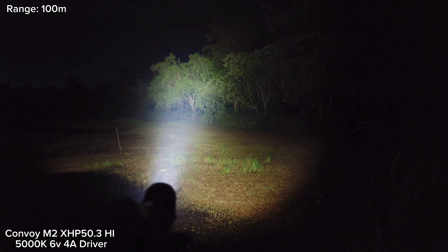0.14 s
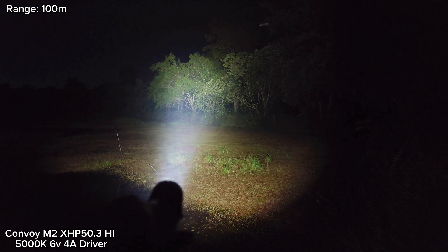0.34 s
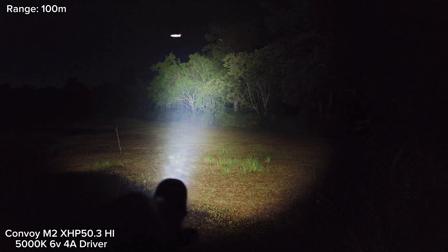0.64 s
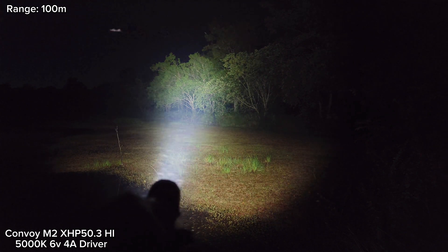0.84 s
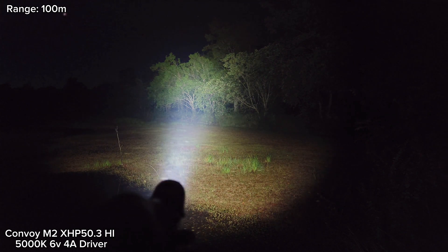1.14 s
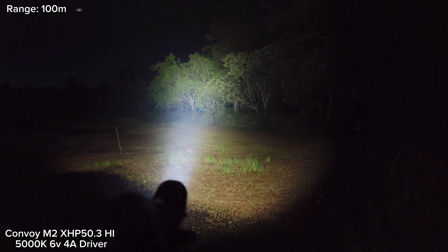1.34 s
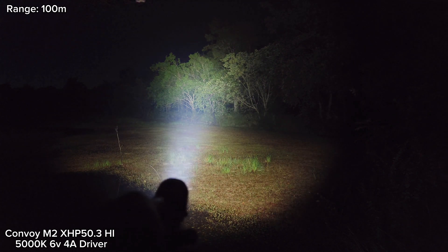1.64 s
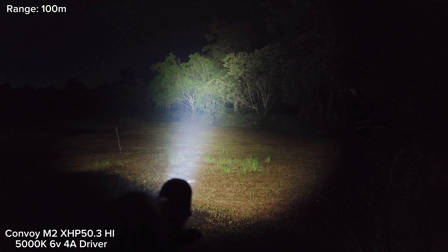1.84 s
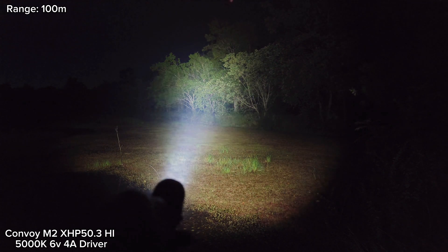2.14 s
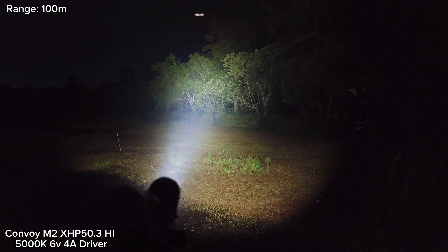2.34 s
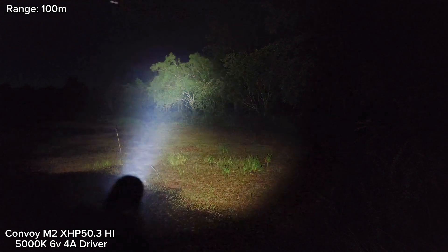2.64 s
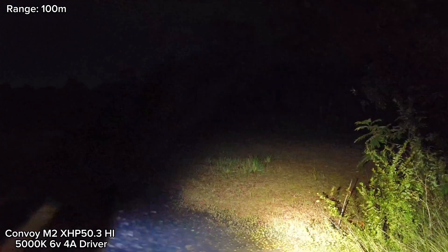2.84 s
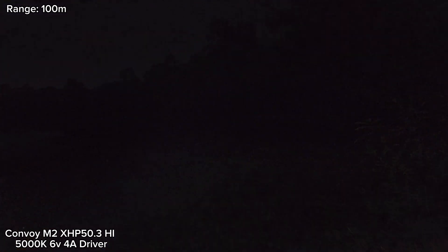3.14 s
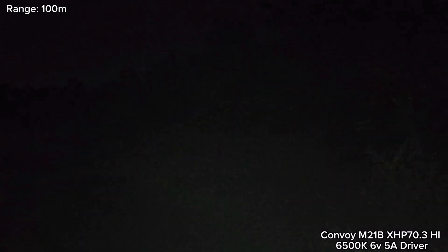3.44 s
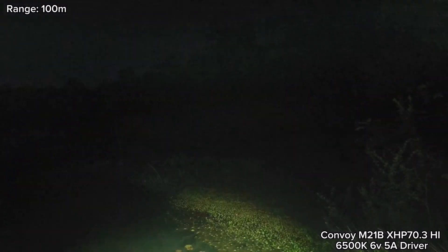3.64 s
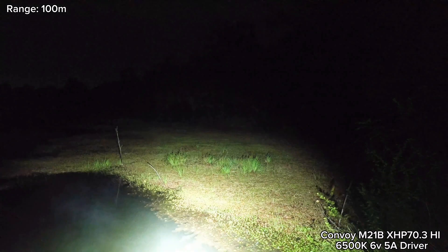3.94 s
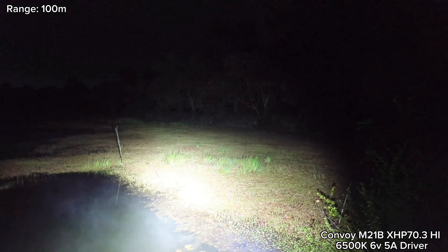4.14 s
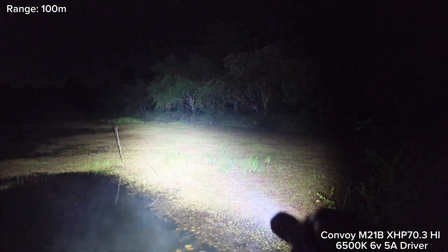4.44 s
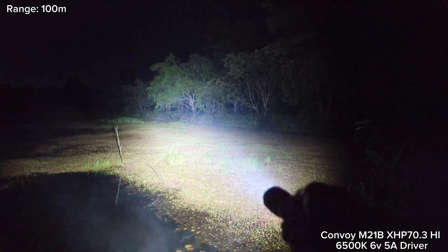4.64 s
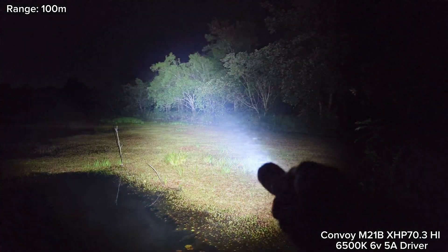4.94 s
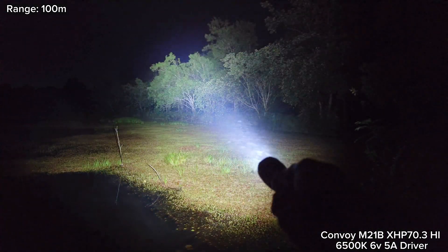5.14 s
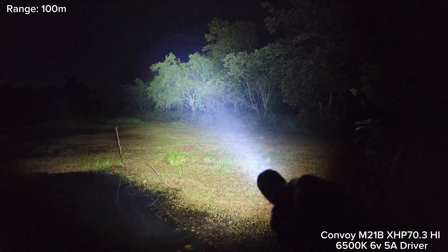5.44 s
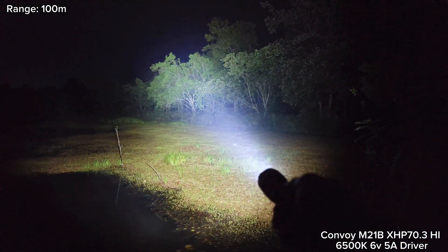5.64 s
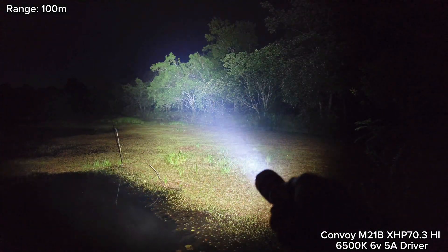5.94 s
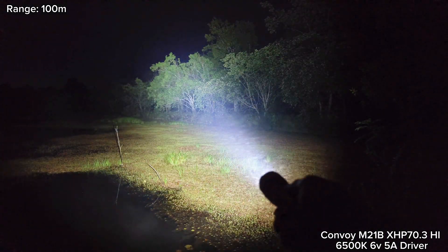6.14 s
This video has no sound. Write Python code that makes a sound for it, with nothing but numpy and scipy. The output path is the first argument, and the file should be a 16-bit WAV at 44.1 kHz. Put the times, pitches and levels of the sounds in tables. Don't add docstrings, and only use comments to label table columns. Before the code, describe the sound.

Night wetland: massed frogs rattle all around, crickets chirp, a bush cricket trills in swells, far engine hum beneath, one abrupt scene cut halfway.

```python
import sys
import numpy as np
from scipy import signal
from scipy.fft import rfft, irfft, next_fast_len
from scipy.io import wavfile
from scipy.ndimage import uniform_filter1d

SR = 44100
rng = np.random.default_rng(int(sys.argv[2]) if len(sys.argv) > 2 else 0)


def voltage_ratio(decibels):
    exponent = np.asarray(decibels, float) / 20
    return 10 ** exponent


def store_wav(level_fs):
    pcm = np.round(np.clip(np.atleast_2d(level_fs), -1, 1) * 32767)
    wavfile.write(sys.argv[1], SR, pcm.T.astype(np.int16))


N = 277830
T = np.arange(N) / SR
CHANGE_S = 3.1846


def unit(x):
    return x / np.sqrt(np.mean(x ** 2))


def over_time(table):
    return np.interp(T, *np.transpose(table))


def on_log(table, hz):
    f, v = np.transpose(table)
    return np.interp(np.log(np.maximum(hz, 1)), np.log(f), v)


def causal(table, stretch, size=2048):
    hz = np.fft.rfftfreq(size, 1 / SR) / stretch
    cepstrum = irfft(np.log(voltage_ratio(on_log(table, hz))))
    cepstrum[1:size // 2] *= 2
    cepstrum[size // 2 + 1:] = 0
    return irfft(np.exp(rfft(cepstrum)))[:size // 2]


def shape(x, gain_of_hz):
    size = next_fast_len(N)
    return irfft(rfft(x, size) * gain_of_hz(np.fft.rfftfreq(size, 1 / SR)), size)[..., :N]


def walk(rate):
    k = int(SR / rate)
    held = rng.standard_normal(N // 100)[np.arange(N) // k]
    return 1.2 * uniform_filter1d(uniform_filter1d(held, k), k)


def swells(rows):
    return sum(db * np.cos(np.pi * np.clip((T - s) / length, -.5, .5)) ** 2 for s, length, db in rows)


def pan(x, db):
    return x * voltage_ratio(np.array([[.5], [-.5]]) * db)


def scatter(x, t60_s, wet_db):
    t = T[:SR // 2]
    tail = rng.standard_normal((2, len(t))) * np.exp(-np.log(1000) * t / t60_s) * (t > .002)
    tail /= np.sqrt(np.sum(tail ** 2, axis=1, keepdims=True))
    return x + voltage_ratio(wet_db) * irfft(rfft(x) * rfft(tail, N), N)


def tone(curve, pan_db, rough):
    s, hz, db = np.transpose(curve)
    hz = np.interp(T, s, hz) * (1 + rough * walk(300))
    level = np.interp(T, s, db, -130, -130) + 13.0
    return pan(np.sin(2 * np.pi * np.cumsum(hz) / SR) * voltage_ratio(level), pan_db)


# f/Hz, left-right correlation [-1 to 1]
EAR_LIKENESS = [(60, 0.96), (130, 0.8), (290, -0.11), (640, -0.67), (1400, -0.43), (3100, -0.16),
                (6800, 0.057), (15000, 0.12)]


def ports(x):
    like = lambda hz: np.clip(on_log(EAR_LIKENESS, hz), -.98, .98)
    mid = shape(x[0] + x[1], lambda hz: np.sqrt(1 + like(hz))) / 2
    side = shape(x[0] - x[1], lambda hz: np.sqrt(1 - like(hz))) / 2
    return np.array([mid + side, mid - side])


# t/s, level/dB
CHORUS_EFFORT = [(0.0, -26.5), (0.14, -28.5), (0.16, -26.5), (1.4, -27.5), (1.54, -25), (1.58, -29),
                 (1.63, -26), (3.16, -30.5), (3.25, -28), (4.02, -27), (4.07, -30), (4.19, -26.5),
                 (4.56, -29), (4.58, -24.5), (4.68, -28), (6.02, -27.5), (6.25, -25), (6.3, -31.5)]
# t/s, left minus right level/dB
CHORUS_LEAN = [(0, 1), (3.18, 0), (3.2, 1.5), (6.3, 2.5)]
# centre t/s, rise level/dB
DEEP_CROAKS = [(.15, 4.5), (.95, 4.5), (1.1, 1.5), (1.4, 4), (1.66, 1.5), (2.17, 4), (2.26, -7.5),
               (2.55, 4), (2.78, 0.5), (3.97, 2), (4.07, -4.5), (4.18, 0), (4.31, 2.5), (4.41, -4.5),
               (4.5, 6), (5.2, 4), (5.36, 1.5), (6.12, 0.5), (6.22, 0)]
CROAK_S = .14
SAC_DB, CHEST_DB = 3.5, -1.4
SAC_EVEN, CHEST_EVEN = 1, 0.62
CHEST_FOLLOW = .5
CHEST_PAN_DB = -0.86


def frogs(count=7):
    crowd = ports(sum(frog(1 + 0.0064 * k) for k in np.linspace(-1, 1, count)))
    lower = shape(crowd, lambda hz: 1 / (1 + (hz / 2000) ** 8))
    effort = uniform_filter1d(over_time(CHORUS_EFFORT), SR // 16)
    chest_db = effort.mean() + CHEST_FOLLOW * (effort - effort.mean())
    chest_db = chest_db + swells((s, CROAK_S, db) for s, db in DEEP_CROAKS)
    sac = steady(crowd - lower, SAC_EVEN) * voltage_ratio(effort + SAC_DB)
    chest = pan(steady(lower, CHEST_EVEN), CHEST_PAN_DB) * voltage_ratio(chest_db + CHEST_DB)
    return pan(sac + chest, over_time(CHORUS_LEAN))


def steady(x, even):
    return unit(x / uniform_filter1d(x ** 2, SR // 8) ** (even / 2))


# f/Hz, level/dB per Hz
THROAT = [(500, -50), (850, -62.5), (1020, -31), (1090, -17), (1180, -6), (1280, -2), (1360, -4.5),
          (1500, -12), (2060, -18), (2300, -16), (2850, 1.5), (3030, 4), (3680, -8), (4140, -22),
          (4400, -44), (5720, -55), (9680, -120)]


def frog(stretch, count=9):
    pulses = sum(croaks(chance) for chance in rng.standard_normal((count, 5)))
    ring = causal(THROAT, stretch)[None]
    return scatter(signal.fftconvolve(pulses, ring, axes=1)[:, :N], 0.22, 0)


def croaks(chance):
    pulse_rate, croak_rate, loudness, side, direction = chance
    jitter, size, wander = rng.standard_normal((3, 800))
    s = (np.cumsum(1 + .05 * jitter) - rng.random()) / (93 * (1 + .05 * pulse_rate))
    call = 2.6 * (1 + 0.1484 * croak_rate) * s + 0.0192 * np.cumsum(wander) + rng.random()
    croak = np.sin(np.pi * np.clip(call % 1 / 0.403, 0, 1)) ** 0.93
    weight = croak * voltage_ratio(2.0 * size + 3.25 * loudness)
    pulses = np.bincount(np.abs(s * SR).astype(int), weight, N)[:N]
    lag = int(15 * direction)
    return pan(np.array([pulses, np.roll(pulses, lag)]), 8 * side)


def cricket(chirps, gap_s, from_hz, to_hz, stroke_s, pan_db):
    t = np.arange(-SR // 40, SR // 40) / SR
    swell = np.cos(np.pi * np.clip(t / stroke_s, -.5, .5)) ** .6
    stroke = swell * np.sin(np.pi * t * (from_hz + to_hz + (to_hz - from_hz) * t / stroke_s))
    strokes = np.zeros((2, N))
    for s, db in chirps:
        for side in strokes:
            at = ((s + gap_s * np.arange(3)) * SR).astype(int)
            echo_at = at + (SR * (.001 + .004 * rng.random(3))).astype(int)
            side[at % N] += voltage_ratio(db + 2.0 * rng.standard_normal(3))
            side[echo_at % N] += voltage_ratio(db - 8 + 5.4 * rng.standard_normal(3))
    song = signal.fftconvolve(strokes, stroke[None], "same", axes=1)
    return scatter(pan(song, pan_db), 0.13, -4.0)


# first chirp t/s, last chirp t/s, level/dB
NEAR_BOUTS = [
    (.094, .685, -36),
    (.921, 2.497, -35.5),
    (2.692, 2.692, -44),
    (2.873, 2.873, -42),
    (3.33, 3.527, -34.5),
    (3.763, 4.355, -34),
    (4.592, 6.167, -38),
]
CHIRP_PERIOD_S = .1968


def near_cricket():
    chirps = [(s, db) for first, last, db in NEAR_BOUTS
              for s in np.arange(first, last + CHIRP_PERIOD_S / 2, CHIRP_PERIOD_S)]
    return cricket(chirps, .0376, 5302, 4584, 0.018, -3)


# first stroke t/s, level/dB
RIGHT_CHIRPS = [
    (2.329, -42),
    (2.61, -40),
    (2.731, -37.5),
    (2.966, -36.5),
    (2.984, -41),
    (3.08, -39),
    (5.409, -38.5),
    (5.64, -40.5),
    (5.658, -41),
    (6.045, -46),
]


def right_cricket():
    return cricket(RIGHT_CHIRPS, .039, 5310, 4580, 0.015, -13.0)


def far_crickets(count=45):
    when, size = rng.random((count, 2)).T
    return cricket(zip(when * N / SR, -49 + 6 * size), 0.049, 5324, 4380, 0.025, -4)


# start t/s, stop t/s, full level/dB, left minus right level/dB
TRILLS = [
    (-.45, 0.296, -39, 1),
    (0.757, 1.525, -40.5, 0),
    (1.98, 2.741, -39.5, -1),
    (3.583, 4.366, -45, -2),
    (4.83, 5.588, -47, 0),
    (6.07, 6.85, -45, 3),
]
TRILL_START_DB, TRILL_SWELL_S, TRILL_STOP_S = -10, 0.57, .02
TRILL_SKIP = 1.6


def bush_cricket():
    cycle = np.cumsum(157 * (1 + 0.0275 * walk(30.84))) / SR
    stroke = cycle.astype(int)
    skip, size = rng.standard_normal((2, N))
    hz = np.where(T < CHANGE_S, 7320, 7220) * (1 + .005 * walk(8))
    pitch = np.sin(2 * np.pi * np.cumsum(hz) / SR + np.cumsum(TRILL_SKIP * skip)[stroke])
    song = unit(pitch * np.sin(np.pi * (cycle % 1)) ** 2.7 * voltage_ratio(2.0 * size[stroke]))
    out = 0
    for start, stop, db, pan_db in TRILLS:
        times = (start, start + TRILL_SWELL_S, stop, stop + TRILL_STOP_S)
        swell = np.interp(T, times, (TRILL_START_DB, 0, 0, -20), -120, -120)
        out = out + pan(song * voltage_ratio(swell + db + 3.0), pan_db)
    lagged = np.array([out[0], np.roll(out[1], shift=2)])
    return scatter(lagged, .12, -7)


# t/s, f/Hz, level/dB
HOOT = [
    (4.445, 730, -78),
    (4.462, 700, -65),
    (4.49, 717, -69),
    (4.53, 690, -77),
    (4.56, 702, -80),
]


def toad():
    return ports(tone(HOOT, -19.5, 0.0145))


# t/s, f/Hz, level/dB
WHINE = [
    (3.065, 11924, -70),
    (3.103, 12523, -60),
    (3.137, 12900, -49),
    (3.171, 12100, -50),
    (3.184, 12213, -73),
]
# from t/s, to t/s, from f/Hz, to f/Hz, level/dB
SQUEAKS = [
    (3.09, 3.13, 14600, 14950, -66),
    (3.16, 3.184, 14900, 14700, -61),
    (3.3, 3.42, 15200, 13900, -73),
]


def torch():
    out = voltage_ratio(-10) * tone(WHINE, 14, .013)
    for start, stop, from_hz, to_hz, db in SQUEAKS:
        middle = ((start + stop) / 2, (from_hz + to_hz) / 2, db)
        out = out + tone([(start, from_hz, db - 12), middle, (stop, to_hz, db - 12)], 4, .008)
    return out


# f/Hz, level/dB per Hz
HISS = [(4000, -5), (4300, -2.5), (4900, 1), (5300, -3), (5550, -13), (6800, -10), (8000, -9),
        (9200, -10.5), (10200, -7), (10900, -10.5), (11150, -33.5), (12300, -92), (13000, -31),
        (14500, -25.5), (15700, -33)]
# f/Hz, left minus right level/dB
HISS_PAN = [(4000, 1.5), (5000, -0.5), (5600, -5), (7000, 5.5), (8000, -4.5), (10000, -6), (11000, -1),
            (15000, -3.5)]
# centre t/s, length t/s, rise level/dB
KATYDIDS = [
    (.4, 0.67, -0.5),
    (1.25, 0.7, 2),
    (2.15, 1, -0.5),
    (3.054, 0.65, 1.5),
    (3.948, 1, 3),
    (4.7, 1, 3),
    (5.5, 0.82, 3.5),
    (6.2, 0.41, 2.5),
]
HISS_DB = -37.5
HISS_EDGES_HZ = (3000, 5500, 7000, 8300, 9500, 11500, 15750)
KATYDID_BAND_HZ = 9500


def far_insects():
    top = np.where(T < CHANGE_S, 0, -2.5) + swells(KATYDIDS)
    out = 0
    for lo_hz, hi_hz in zip(HISS_EDGES_HZ[:-1], HISS_EDGES_HZ[1:]):
        in_band = lambda hz: voltage_ratio(on_log(HISS, hz)) * (hz >= lo_hz) * (hz < hi_hz)
        band = shape(rng.standard_normal((2, N)), in_band)
        swell = top if lo_hz == KATYDID_BAND_HZ else .8 * walk(1.2)
        out = out + band * voltage_ratio(swell + 1.02 * walk(24.98) + 1.0 * walk(220))
    left = shape(out[0], lambda hz: voltage_ratio(on_log(HISS_PAN, hz) * .5))
    right = shape(out[1], lambda hz: voltage_ratio(on_log(HISS_PAN, hz) * -.5))
    return unit(np.array([left, right])) * voltage_ratio(HISS_DB)


# multiple of its turning rate [-], level/dB
ENGINE = [(2, -55), (3, -64), (5, -68), (6, -65), (7, -67.5)]
# t/s, level/dB
ENGINE_FOURTH = [(0.0, -58), (1.54, -47.5), (1.75, -72), (1.88, -51), (1.93, -57.5), (3.58, -51.5),
                 (4.09, -73), (4.14, -53.5), (5.11, -46), (5.61, -54.5), (6.21, -50), (6.3, -55)]
ENGINE_HZ = 33.88


def engine():
    turn = 2 * np.pi * np.cumsum(ENGINE_HZ * (1 + 0.00416 * walk(2.03))) / SR
    hum = sum(voltage_ratio(db + 2.5 * walk(4)) * np.sin(k * turn + 4.0 * walk(3)) for k, db in ENGINE)
    return hum + voltage_ratio(over_time(ENGINE_FOURTH) + 3) * np.sin(4 * turn)


# f/Hz, level/dB per Hz
RUMBLE = [(13, -35), (22, -26), (65, -1.5), (107, -1.5), (147, -8), (184, -12.5), (253, -15), (338, -26),
          (572, -31.5), (839, -29.5), (1000, -17), (1300, -50), (2200, -120)]
RUMBLE_DB = -47


def rumble():
    air = shape(rng.standard_normal((2, N)), lambda hz: voltage_ratio(on_log(RUMBLE, hz)) * (hz < 1000))
    return unit(ports(air)) * voltage_ratio(RUMBLE_DB)


def scene():
    crickets = near_cricket() + right_cricket() + far_crickets()
    singers = frogs() + crickets + bush_cricket() + toad()
    return singers + torch() + far_insects() + engine() + rumble()


def band_limit(x):
    return signal.sosfilt(signal.butter(12, 15760, fs=SR, output="sos"), x)


CHANGE_DB, FADE_S = -23, .0105
CLICK_DB, CLICK_S = -39, .0004


def record(dry):
    fade = np.clip((T - CHANGE_S) / FADE_S, 0, 1) ** 3
    click = voltage_ratio(CLICK_DB) * np.exp(-np.abs(T - CHANGE_S) / CLICK_S) * (T >= CHANGE_S)
    gain = np.where(T < CHANGE_S, 1, voltage_ratio(CHANGE_DB) + (1 - voltage_ratio(CHANGE_DB)) * fade)
    return band_limit(dry * gain + click)


dry = scene()
out = record(dry)
store_wav(out)
```